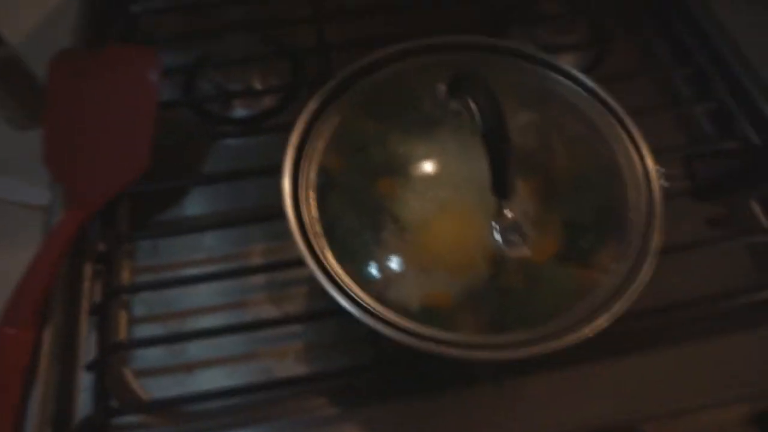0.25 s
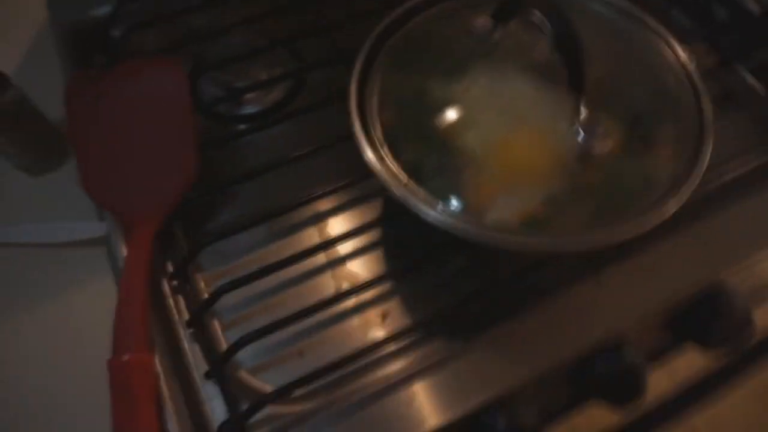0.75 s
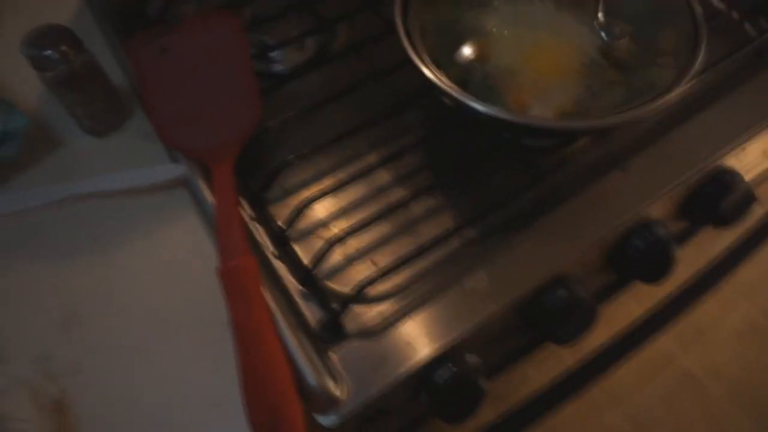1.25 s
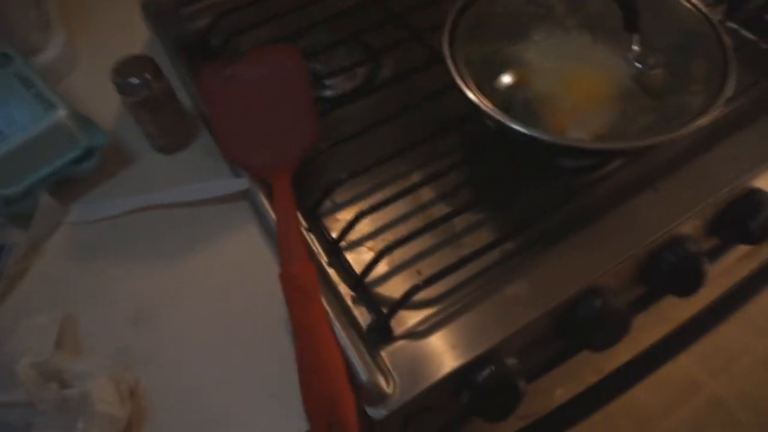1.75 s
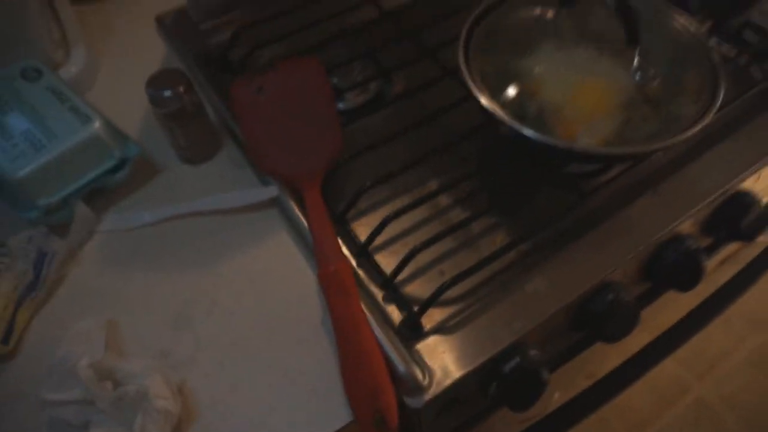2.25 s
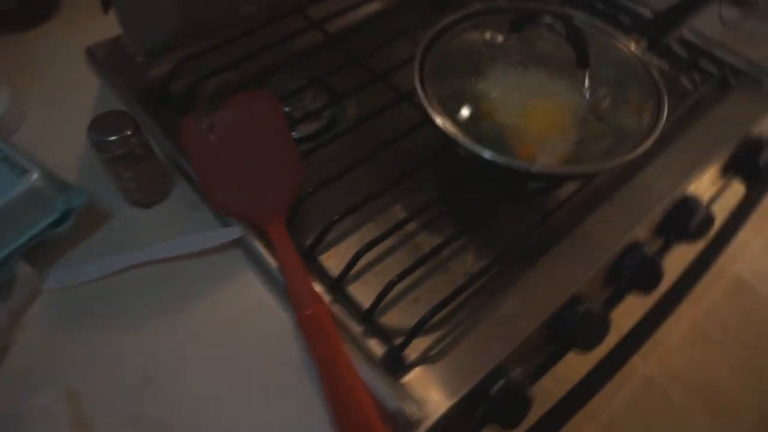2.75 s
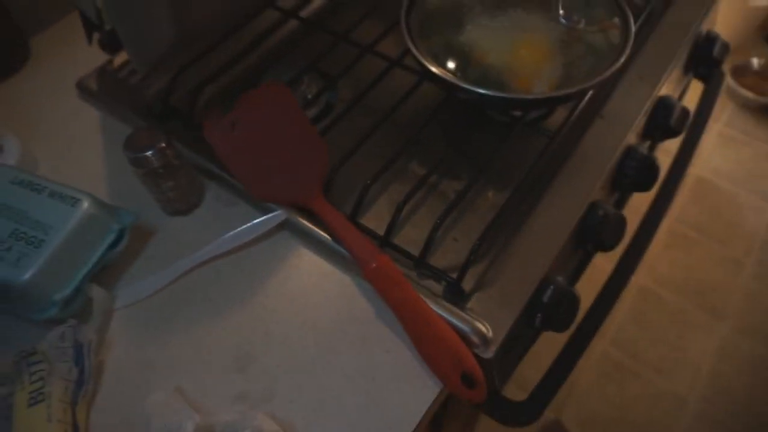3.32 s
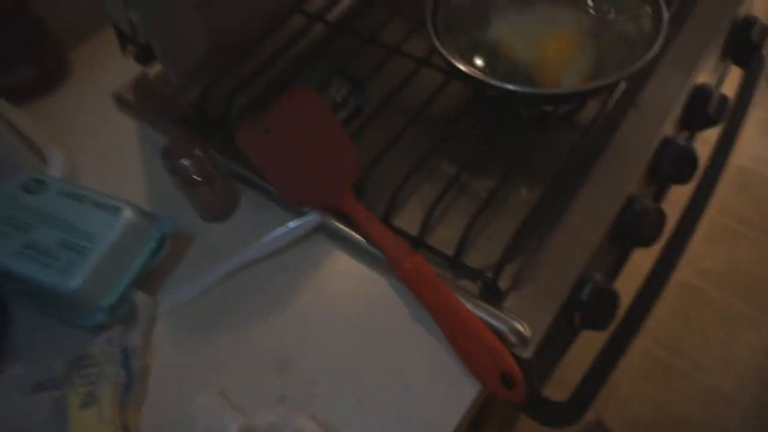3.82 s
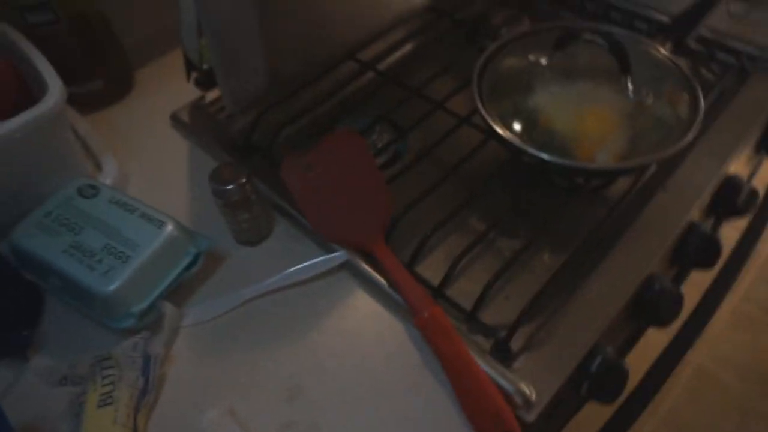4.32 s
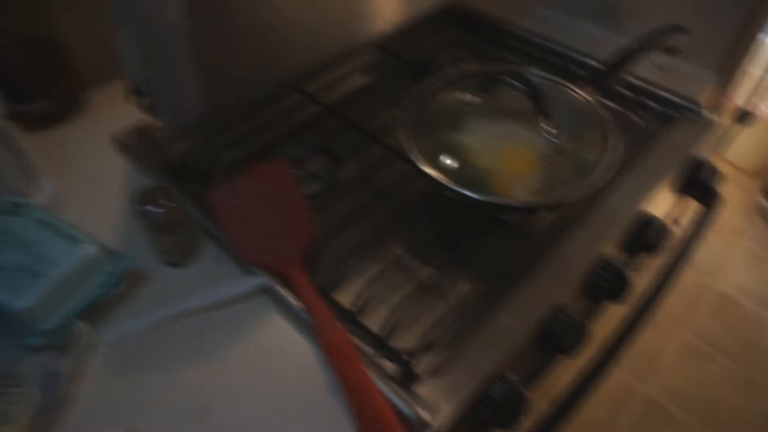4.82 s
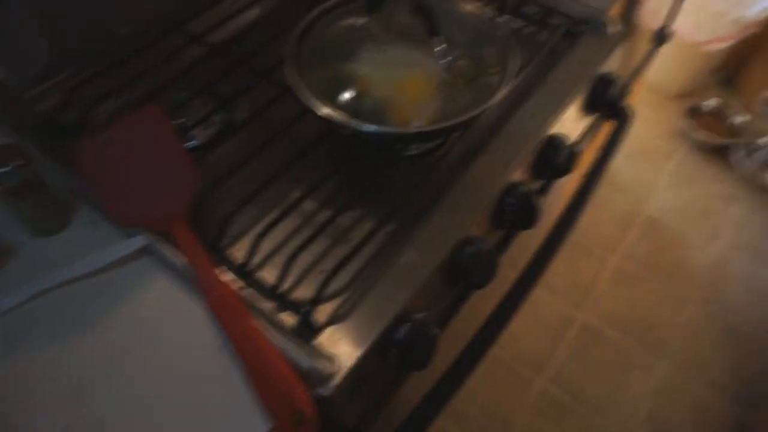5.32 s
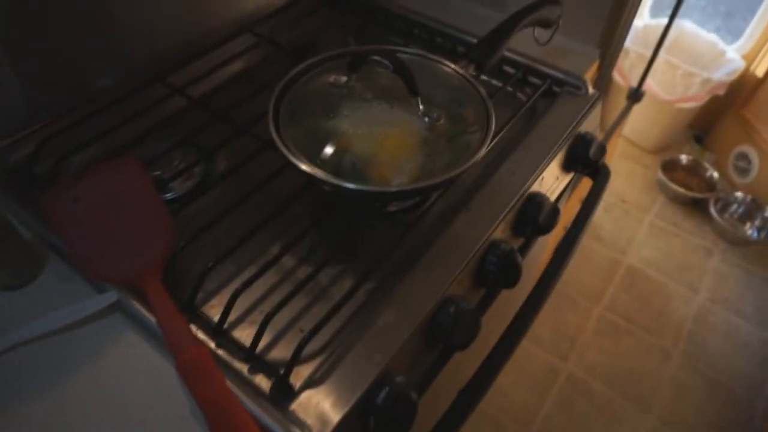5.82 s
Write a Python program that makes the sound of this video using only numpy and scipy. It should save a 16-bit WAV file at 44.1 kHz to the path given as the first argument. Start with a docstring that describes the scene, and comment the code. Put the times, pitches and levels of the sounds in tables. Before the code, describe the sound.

Dense, bright sizzling and spitting of an egg frying under a lid, with hollow knocks and a short rough drag on the left.

```python
"""A dense crackle with single spits and low gurgles: butter, egg and vegetables fry under a glass lid in a
small, hard-walled kitchen. Random bursts echo under the lid; filtered noise simmers; short tones gurgle.
To the left something hollow is knocked about, ringing damped modes, and dragged across the floor as rough
noise; one knock sets a metal vessel ringing. The floor passes dull noise thumps to hand-held microphones."""
import sys
import numpy as np
from scipy import signal
from scipy.fft import rfft, irfft, next_fast_len
from scipy.io import wavfile
from scipy.ndimage import map_coordinates

SR = 44100
rng = np.random.default_rng(int(sys.argv[2]) if len(sys.argv) > 2 else 0)


def undo_db(level):
    """Turn decibels back into plain size, where 20 dB means ten times bigger."""
    steps = np.asarray(level, float) / 20
    return 10 ** steps


def master_out(mix):
    """Clip the mix to full scale and print it as 16-bit PCM to the path in sys.argv[1]."""
    frames = np.transpose(np.atleast_2d(mix))
    ceiling = np.clip(frames, -1, 1)
    pcm = np.round(ceiling * 32767).astype(np.int16)
    wavfile.write(sys.argv[1], SR, pcm)


N = 267687  # samples

# the frying: its crackle surges and ebbs, then drifts to the left:
# (time [s], crackle level [dB], left over right [dB])
FRYING_COURSE = [(0, -26.5, 0), (.6, -25.5, -0.5), (.75, -28.5, 0), (.92, -23, -0.5), (1.0, -25, 0.5),
                 (1.45, -23.5, -.5), (2.0, -26.5, 0.5), (2.6, -25.5, -1), (3.35, -26, 0.5),
                 (3.6, -25.5, 0.5), (3.9, -25, .5), (4.6, -27.5, 1.5), (5.3, -26, 1), (5.6, -25.5, 2.5),
                 (6.07, -26, 3.5)]
# crackle colour under the lid: (frequency [Hz], density [dB per Hz])
CRACKLE_COLOUR = [(120, -70), (300, -37), (500, -23), (850, -23), (1170, -23), (1320, -8), (1510, -6),
                  (1800, -13), (1980, -7.5), (2270, -6), (3990, -5.5), (4740, -3.5), (5700, -2.5),
                  (7030, -1.5), (13000, 1.5), (15600, -2), (16000, -38)]
# narrow gaps that the covered pan cuts into that colour: (frequency [Hz], width [Hz], depth [0-1])
LID_GAPS = [(1673, 42, 1), (3360, 116, 1)]
# reflections from lid and stove top: (delay [s], level [dB])
LID_ECHOES = [(.0006, -28), (.0018, -7)]
# the loudest spits of fat: (time [s], click level [dB])
LOUD_SPITS = [(0.0198, -9), (0.24, -3), (0.4124, -8), (0.5161, -8), (0.5798, -7), (0.6423, -8),
              (0.7185, -8), (0.7711, -7), (0.8068, -7), (0.909, -6), (0.9226, -3), (1.0496, -6),
              (1.1452, -8), (1.2127, -4), (1.2322, -7), (1.5584, -7), (1.8064, -9), (1.8183, -8),
              (1.852, -6), (2.064, -8), (2.2915, -8), (2.3498, -9), (2.7477, -7), (2.8248, -8),
              (2.8897, -7), (2.9825, -8), (3.1272, -6), (3.2222, -9), (3.3152, -8), (3.4327, -8),
              (3.467, -9), (3.538, -10), (3.8965, -9), (4.3324, -9), (4.6023, -7), (4.9502, -8),
              (5.2197, -8), (5.26, -8), (5.4656, -8), (5.6167, -8), (5.8453, -8), (5.9674, -7)]
# simmer colour: (frequency [Hz], density [dB per Hz])
SIMMER_COLOUR = [(88, -48), (150, -25), (204, -8), (303, -5), (351, 0), (566, -4), (950, -14), (1240, -18),
                 (2090, -120)]
# big bubbles: (time [s], tone level [dB], pitch [Hz], length [s])
BIG_BUBBLES = [(0.201, -41.5, 606, 0.032), (0.305, -45.5, 368, 0.039), (0.396, -40.5, 505, 0.039),
               (0.476, -37.5, 520, 0.064), (0.538, -43.5, 777, 0.032), (1.252, -39.5, 678, 0.032),
               (1.829, -39, 559, 0.02)]
# knocks: (time [s], level [dB], centre [Hz], upper centre [Hz], upper over centre [dB])
BLOWS = [(1.325, -8, 810, 2360, -14.5), (1.10, -34.5, 452, 1310, -10), (1.18, -34.5, 380, 1300, -8),
         (2.33, -23, 410, 1400, -18), (2.426, -31.5, 600, 1500, -11), (2.483, -35, 385, 1500, -15),
         (2.729, -28.5, 330, 1310, -6.5), (2.806, -35.5, 557, 1400, -15), (3.274, -32, 500, 1420, 2.5),
         (3.303, -18, 690, 2100, 4), (3.382, -17, 900, 2000, 5.5), (3.687, -12.5, 453, 2000, 1),
         (3.784, -14.5, 560, 1500, -12), (3.831, -9, 990, 2200, -15), (3.854, -10.5, 1100, 2600, -3),
         (3.967, -8.5, 900, 1730, 6.5), (4.138, -10, 605, 2300, 2), (4.205, -18, 1300, 2500, 4),
         (4.980, -12, 800, 2770, -4.5), (5.092, -31, 700, 1500, -7), (5.24, -20.5, 500, 1320, -3),
         (5.29, -32, 600, 2200, -10), (5.56, -36.5, 1000, 2200, -13), (5.944, -8.5, 780, 3020, 16)]
# modes of the hollow body: (frequency [Hz], width [Hz], prominence before scaling [dB])
BODY_MODES = [(311, 27, 12.5), (422, 58, 8.5), (484, 35, -0.5), (575, 65, 12), (723, 48, 3),
              (1045, 41, -8.5), (1184, 108, 25), (1412, 47, 2.5), (1713, 51, -11.5), (1858, 37, -1.5),
              (2140, 44, -3), (2393, 13, -15), (2930, 92, 19.5), (2860, 140, -18), (3216, 43, 9.5),
              (3770, 43, 11)]
# dragging, one long stroke with harder shoves on top: (time [s], hold [s], level [dB])
DRAG_STROKES = [(3.678, .55, -29), (3.84, .03, -23), (4.185, .03, -27)]
# scrape colour: (frequency [Hz], density [dB per Hz])
SCRAPE_COLOUR = [(88, -42), (150, -17), (228, -7), (381, -9), (462, -4), (725, -2.5), (923, -6.5),
                 (1210, 1.5), (1450, -0.5), (2310, -2), (7000, -12), (9100, -11), (15400, -120)]
# partials of the metal vessel: (frequency [Hz], starting level [dB], t60 [s])
VESSEL_PARTIALS = [(205, -36, .4), (301, -34, .22), (834, -29.5, .65)]
# thumps through the floor: (time [s], level [dB])
FLOOR_THUMPS = [(0.169, -57), (0.73, -54), (0.909, -64), (1.175, -48), (1.326, -25), (1.739, -46),
                (2.329, -41), (2.731, -37), (2.797, -42), (3.281, -42), (3.388, -42.5), (3.682, -22),
                (3.969, -55), (4.139, -59), (4.98, -49), (5.946, -36)]
# floor colour: (frequency [Hz], density [dB per Hz])
FLOOR_COLOUR = [(25, -19), (60, -5), (90, -5), (113, -1.5), (140, -12.5), (220, -13.5), (320, -21),
                (600, -120)]
# reverberation of the kitchen: (frequency [Hz], t60 [s])
KITCHEN_DECAY = [(150, 0.21), (1000, 0.18), (5000, 0.079), (14000, 0.035)]
# how much of the side signal the close ports keep: (frequency [Hz], gain [dB])
PORT_SIDE_GAIN = [(100, -11), (380, -15), (700, -3), (1300, -3), (4000, -1.5), (15000, -0.5)]

SWELL_DB = 1.1  # the crackle swells and lulls a few times a second
SMALL_SPITS_PER_S, SMALL_SPIT_DB, SMALL_SPIT_RANGE_DB = 11, -10, 2.4  # range: either way, evenly
SIMMER_DB, SIMMER_DRIFT_DB = -50.5, 3.5  # rms, and how far it drifts
BROAD_OCTAVES, OCTAVES_PER_DB = 1.05, 0.03  # a brighter blow rings a wider span of modes
STROKE_ATTACK_S, STROKE_T60_S = 0.005, 0.22
VESSEL_AT_S = 1.327
LEFTWARD = undo_db([[2.2], [-2.2]])  # gains of the two ports for sounds on the left
RUMBLE_DB, DRAG_RUMBLE_DB = -82, -25  # the quiet floor; what dragging adds, relative to the scrape


def unit(x):
    """Normalisation: scales the signal to an rms of 1."""
    return x / np.sqrt(np.mean(x ** 2) + 1e-20)


def along(points, hz):
    """Interpolation of (frequency, value) points on a logarithmic frequency axis."""
    f, v = np.transpose(points)
    return np.interp(np.log(hz + 1), np.log(f + 1), v)


def curves(rows):
    """Linear interpolation in time: one value per sample for each column after the time."""
    s, *cols = np.transpose(rows)
    return [np.interp(np.arange(N) / SR, s, c) for c in cols]


def wobble(rate):
    """Slow random modulation: a smooth curve through `rate` random knots a second."""
    knots = rng.standard_normal(int(N * rate / SR) + 4)
    return map_coordinates(knots, [np.arange(N) * rate / SR])


def filtered(x, response):
    """Linear filtering: the spectrum is multiplied by a response of frequency."""
    m = next_fast_len(x.shape[-1] + 8192)
    spectrum = rfft(x, m) * response(np.fft.rfftfreq(m, 1 / SR))
    return irfft(spectrum, m)[..., :x.shape[-1]]


def coloured(x, colour):
    """Spectral shaping by a (Hz, dB) colour, then rms 1."""
    return unit(filtered(x, lambda hz: undo_db(along(colour, hz))))


def resonance(centre_hz, width_hz):
    """Simple resonance: the causal band-pass response of a damped oscillator."""
    return lambda f: 1j * f * width_hz / (centre_hz ** 2 - f * f + 1j * f * width_hz)


def spread(x, alike):
    """Partial coherence: two unrelated signals mixed to a pair of the given likeness."""
    turn = np.arccos(np.clip(alike, 0, 1)) / 2
    common, opposed = np.cos(turn) * x[0], np.sin(turn) * x[1]
    return np.array([common + opposed, common - opposed])


def sides(x, pan_db, lead_per_db):
    """Interaural cues: the louder port also hears the sound earlier, by lead_per_db samples per dB."""
    n, lead = np.arange(N), lead_per_db * pan_db / 2
    left = map_coordinates(x[0], [n + lead], order=5)
    right = map_coordinates(x[1], [n - lead], order=5)
    return np.array([left, right]) * undo_db(np.array([pan_db / 2, -pan_db / 2]))


def frying():
    """Superposed random bursts: crackle grains and spits over a fine fizz, with a low simmer beneath."""
    crackle_db, pan_db = curves(FRYING_COURSE)
    grains = sum(under_lid(bursts(per_s=220, scatter_db=4.5, clump_db=3.5), t60=0.011, echo_db=1.5)
                 for _ in range(4))
    fizz = spread(rng.standard_normal((2, N)), alike=0.4)
    fizz *= undo_db(0.7 * wobble(25) + 1.5 * wobble(90))
    bed = unit(grains) + undo_db(-1.5) * unit(fizz)
    crackle = unit(filtered(bed, lid_colour)) * undo_db(crackle_db + SWELL_DB * wobble(8))
    return sides(crackle + spits(), pan_db, lead_per_db=1.07) + simmer()


def bursts(per_s, scatter_db, clump_db):
    """Clumped random arrivals: steam bubbles burst at random moments; few are large."""
    chance = per_s / SR * undo_db(clump_db * wobble(30))  # clumping modulates the basic rate
    size = undo_db(scatter_db * np.minimum(rng.exponential(size=N), 3.3)) * rng.choice([-1, 1], N)
    return (rng.random(N) < chance) * size


def under_lid(x, t60, echo_db):
    """Early reflection: bursts return from lid and stove top, then rattle differently for the two ports."""
    t = np.arange(SR // 40) / SR
    rattle = rng.standard_normal((2, len(t))) * undo_db(-60 * t / t60)
    rattle *= undo_db(echo_db) / np.linalg.norm(rattle[0])
    for delay_s, db in LID_ECHOES:
        rattle[:, round(delay_s * SR)] += undo_db(db)
    return x + signal.fftconvolve(x[None], rattle, axes=1)[:, :N]


def lid_colour(hz):
    """Absorption by resonance: the crackle's colour with narrow gaps cut by the covered pan."""
    gaps = [1 - depth * resonance(centre_hz, width_hz)(hz) for centre_hz, width_hz, depth in LID_GAPS]
    return undo_db(along(CRACKLE_COLOUR, hz)) * np.prod(gaps, 0)


def spits():
    """Impulse excitation: sharp clicks in the crackle's colour, from different spots of the pan."""
    small = [(rng.random() * (N - 1) / SR, SMALL_SPIT_DB + rng.uniform(-1, 1) * SMALL_SPIT_RANGE_DB)
             for _ in range(round(SMALL_SPITS_PER_S * N / SR))]
    clicks = np.zeros((5, N))  # one row per spot
    for k, (s, db) in enumerate(LOUD_SPITS + small):
        clicks[k % len(clicks), round(s * SR)] = undo_db(db) * rng.choice([-1, 1])
    click_peak = np.abs(filtered(signal.unit_impulse(1024, "mid"), lid_colour)).max()
    echoed = sum(under_lid(c, t60=0.009, echo_db=-3) for c in clicks)
    return filtered(echoed, lid_colour) / click_peak


def simmer():
    """Shaped noise: a low, fluctuating bubbling, nearly unrelated at the two ports."""
    blobs = spread(rng.standard_normal((2, N)), alike=0.12)
    blobs *= undo_db(1.64 * wobble(35) + SIMMER_DRIFT_DB * wobble(1.54))
    return coloured(blobs, SIMMER_COLOUR) * undo_db(SIMMER_DB)


def gurgles():
    """Bubble oscillation: large bubbles under the egg each give a soft, breathy tone that throbs twice."""
    out, t = np.zeros(N), np.arange(SR // 8) / SR
    for s, db, hz, length in BIG_BUBBLES:
        u = np.clip(t / length, 0, 1)
        shape = np.sin(np.pi * u) ** 0.19 * (1 - 0.76 * np.cos(4 * np.pi * u))
        breath = 0.5 * unit(filtered(rng.standard_normal(len(t)), resonance(1.16 * hz, 210)))
        out[round(s * SR):][:len(t)] += undo_db(db) * shape * (np.sin(2 * np.pi * hz * t) + breath)
    return out + undo_db(-3.0) * room(out)


def knocks():
    """Modal excitation: blows ring the modes near two centres, with a chatter of loose contact."""
    out, t = np.zeros((2, N + SR)), np.arange(SR // 2) / SR
    mode_hz, width_hz, mode_db = np.transpose(BODY_MODES)[..., None]

    def fade(t60):
        """Exponential decay after a brief rise."""
        return undo_db(-60 * t / t60) * (1 - np.exp(-t / 0.0017))

    def bell(f, centre, span):
        """Bell-shaped band, 6 dB down at `span` octaves from its centre."""
        return undo_db(-6 * (np.log2((f + 1) / centre) / span) ** 2)

    for s, db, hz, upper_hz, upper_db in BLOWS:
        octaves = np.clip(BROAD_OCTAVES + OCTAVES_PER_DB * upper_db, 0.45, 1.1)

        def colour(f):
            """Force spectrum of the blow; the contact cracks broadly too."""
            upper = bell(f, upper_hz, 600 / upper_hz) + 0.59 * bell(f, upper_hz, 0.91)
            return bell(f, hz, octaves) + undo_db(upper_db) * upper

        share = colour(mode_hz) * undo_db(0.4 * mode_db + rng.normal(0, 2.5, (2, len(BODY_MODES), 1)))
        cycles = mode_hz * t + 0.49 * rng.random((len(BODY_MODES), 1))
        modes = undo_db(-60 * t * width_hz / 1.78) * np.sin(2 * np.pi * cycles)  # wider modes die sooner
        body = (share * modes).sum(1) * fade(0.16)
        body /= np.abs(body.mean(0)).max()
        noise = filtered(spread(rng.standard_normal((2, len(t))), alike=0.26), colour)
        chatter = unit(noise) * fade(0.075)
        out[:, round(s * SR):][:, :len(t)] += undo_db(db) * (body + undo_db(-8.0) * chatter)
    return out[:, :N] * LEFTWARD


def drag():
    """Sliding friction: rough slips across the floor, as shaped noise that follows the pressure."""
    slips = spread(rng.standard_normal((2, N)), alike=0.45) * undo_db(2.2 * wobble(70))
    return coloured(slips, SCRAPE_COLOUR) * pressure() * LEFTWARD


def pressure():
    """Contact force of the dragged thing on the floor: each stroke rises, holds and lets go."""
    t, total = np.arange(N) / SR, np.zeros(N)
    for s, hold, db in DRAG_STROKES:
        rise = np.clip((t - s) / STROKE_ATTACK_S, 0, 1) ** 2
        since_release = np.clip(t - s - STROKE_ATTACK_S - hold, 0, None)
        total += undo_db(db - 60 * since_release / STROKE_T60_S) * rise
    return total


def vessel():
    """Free vibration: one knock leaves a metal vessel ringing on the left in decaying partials."""
    t = np.clip(np.arange(N) / SR - VESSEL_AT_S, 0, None)
    ring = sum(undo_db(db - 60 * t / t60) * np.sin(2 * np.pi * hz * t) for hz, db, t60 in VESSEL_PARTIALS)
    return ring * LEFTWARD


def rumble():
    """Structure-borne sound: the floor carries steps and blows, alike at both ports, most near 113 Hz."""
    t = np.arange(N) / SR
    size = (undo_db(RUMBLE_DB) + undo_db(DRAG_RUMBLE_DB) * pressure()) * undo_db(4.7 * wobble(24))
    for s, db in FLOOR_THUMPS:
        since = np.clip(t - s, 0, None)
        size = size + undo_db(db - 60 * since / 0.28) * (1 - np.exp(-since / 0.0043))
    return size * coloured(rng.standard_normal(N), FLOOR_COLOUR)


def room(x):
    """Diffuse reverberation: a fresh noise tail per side, every frequency dying at its own speed."""
    hz, t, z = signal.stft(rng.standard_normal((2, SR // 3)), SR, nperseg=128)
    decay = undo_db(-60 * t / along(KITCHEN_DECAY, hz)[:, None])
    tail = signal.istft(z * decay, SR, nperseg=128)[1]
    return signal.fftconvolve(np.atleast_2d(x), tail / np.linalg.norm(tail[0]), axes=1)[:, :N]


def scene():
    """Superposition: the crackle and simmer are near and dry; gurgles and knocks carry room,
    and the knocks reach the left port first."""
    handling = knocks() + drag()
    handling[1] = np.roll(handling[1], 2)  # samples
    return frying() + gurgles() + handling + undo_db(-3.5) * room(handling) + vessel() + rumble()


def gain_control(x, knee_db, strength, release):
    """Dynamic compression: peaks above the knee pull the gain down just after them; it recovers slowly."""
    over = np.clip(np.abs(x).max(0) / undo_db(knee_db) - 1, 0, None)
    t = np.arange(SR // 2) / SR
    pull = signal.fftconvolve(over, np.exp(-t / release) * (1 - np.exp(-t / 0.0069)))[:N]
    return x * undo_db(-4.5 * np.tanh(strength * pull))  # never more than 4.5 dB down


def roll_off(x):
    """The treble ends steeply here."""
    return signal.sosfilt(signal.butter(12, 16380, fs=SR, output="sos"), x)


def record(dry):
    """Long-wave coherence: close ports hear the bass alike; then a bass cut and gain control."""
    mid, side = (dry[0] + dry[1]) / 2, (dry[0] - dry[1]) / 2
    side = filtered(side, lambda hz: undo_db(along(PORT_SIDE_GAIN, hz)))
    pair = np.array([mid + side, mid - side])
    pair = filtered(pair, lambda hz: 1 / (1 + (70 / (hz + 1)) ** 3))  # bass cut, 6 dB down near 70 Hz
    mix = gain_control(pair, knee_db=-6.5, strength=0.43, release=0.057)
    return roll_off(mix)


dry = scene()
out = record(dry)
master_out(out)
```